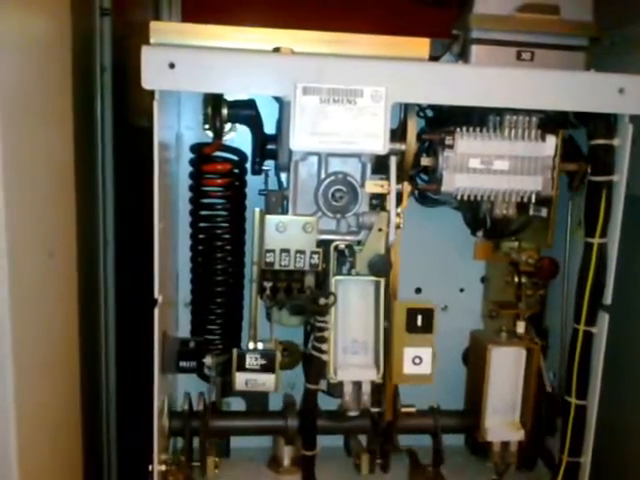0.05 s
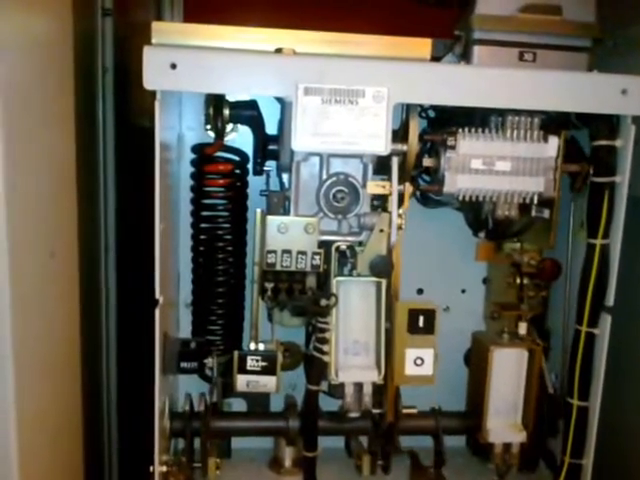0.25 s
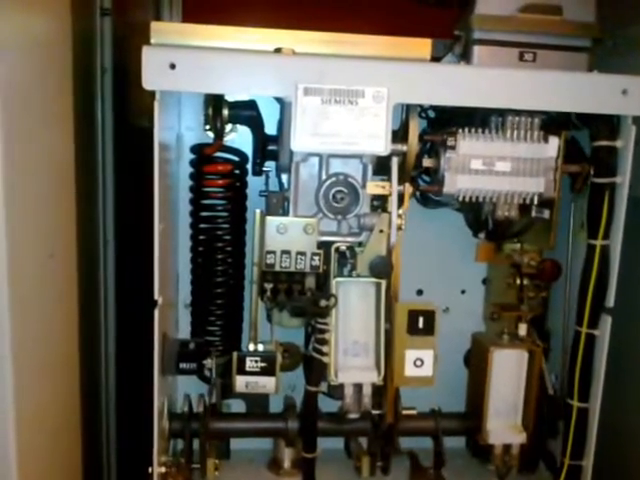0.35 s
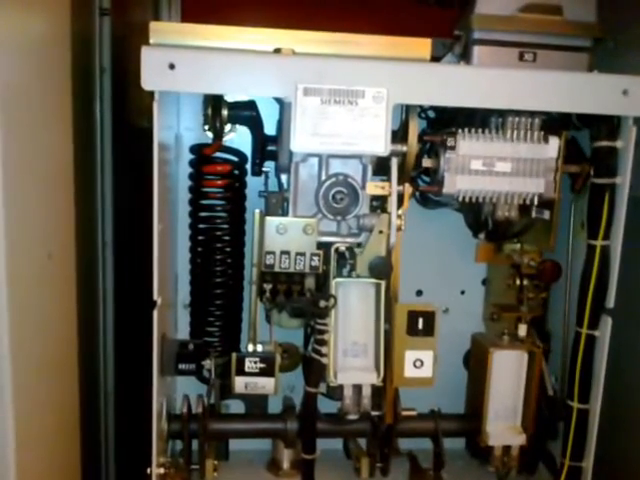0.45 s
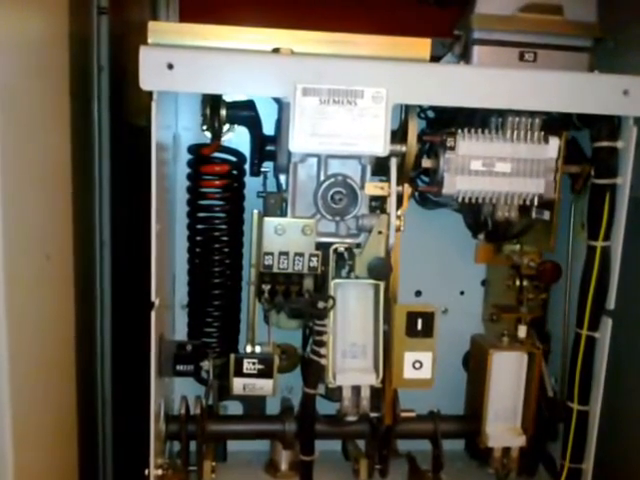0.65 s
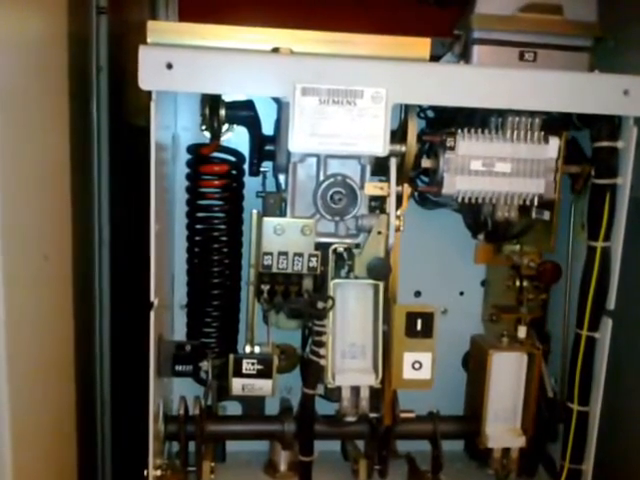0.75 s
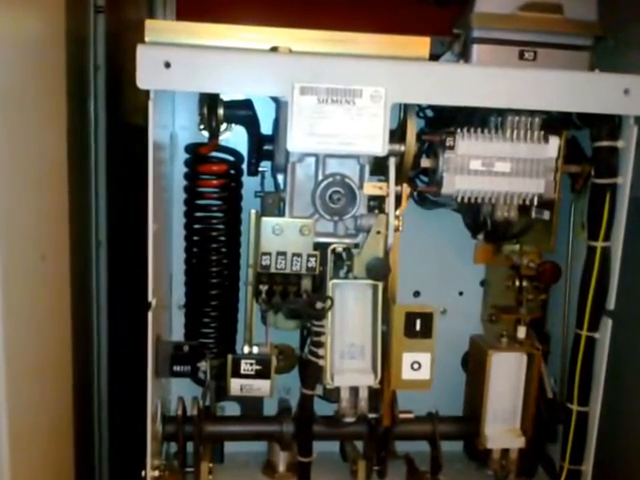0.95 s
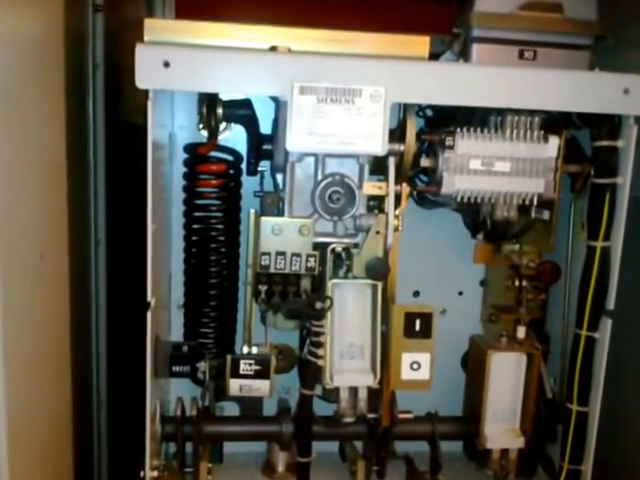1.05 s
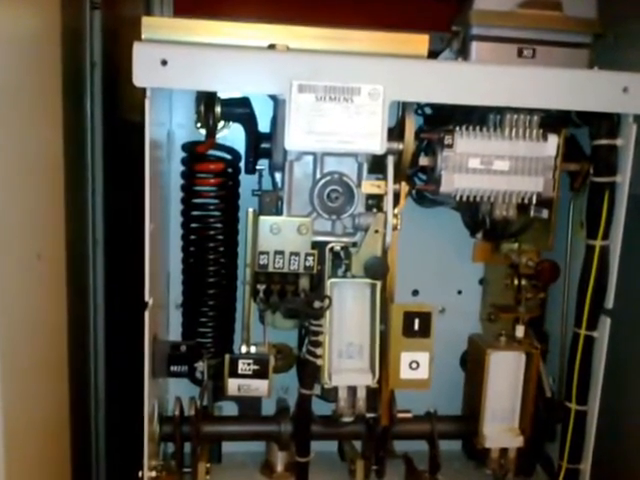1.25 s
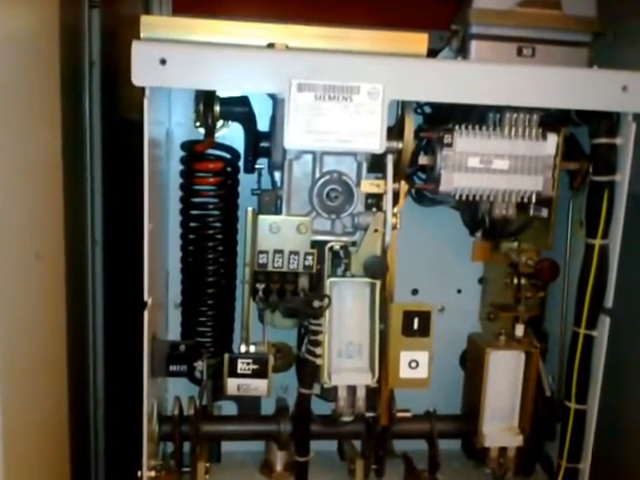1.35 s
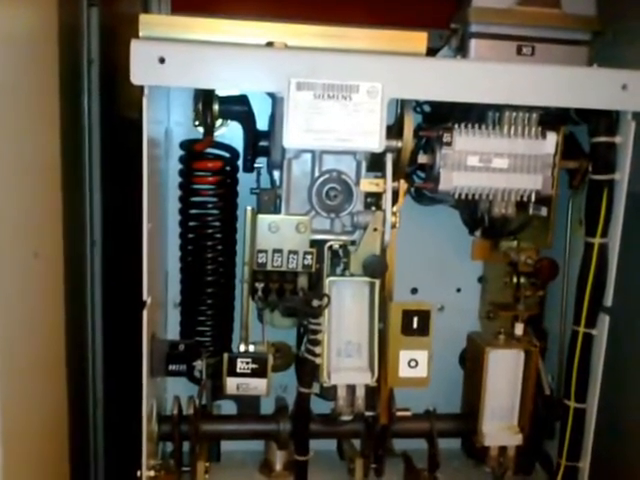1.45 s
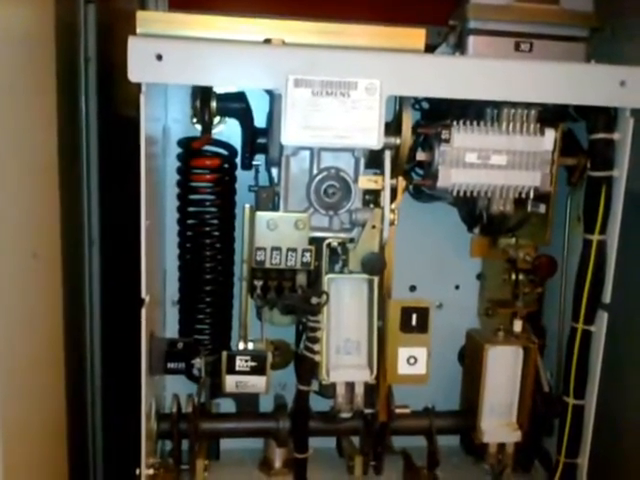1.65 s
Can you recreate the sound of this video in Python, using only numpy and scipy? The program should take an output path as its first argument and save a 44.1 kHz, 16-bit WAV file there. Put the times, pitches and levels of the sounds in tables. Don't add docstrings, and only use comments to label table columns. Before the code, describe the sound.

A heavy circuit breaker slams shut inside a steel cabinet: brief latch rattle, crushing metallic bang with a tiny scrape, low frame thud, then panels ring out in a hard room, close microphone overloading.

```python
import sys
import numpy as np
from scipy import signal
from scipy.fft import rfft, irfft
from scipy.io import wavfile
from scipy.ndimage import uniform_filter1d

SR = 44100
rng = np.random.default_rng(int(sys.argv[2]) if len(sys.argv) > 2 else 0)


def generate_wav(sig):
    pcm = np.round(np.clip(np.atleast_2d(sig).T, -1, 1) * 32767).astype(np.int16)
    wavfile.write(sys.argv[1], SR, pcm)


def invert_db(x):
    u = np.asarray(x, float) / 20
    return 10 ** u


N = 74970
SLAM_S, SHOVE_S = 0.206, 0.2385

# pitch_hz [Hz], t60_s [s]
ROOM_T60 = [(40, 1.8), (140, 2.5), (500, 1.655), (1500, 1.236), (3000, 1.095), (6000, 0.75), (10000, 0.6),
            (15000, .33)]


def set_rms(x, db):
    return x * invert_db(db) / np.sqrt(np.mean(x ** 2))


def read_curve(table, hz):
    table_hz, values = np.array(table).T
    return np.interp(np.log(hz + 1), np.log(table_hz), values)


def coloured_noise(colour):
    hz = np.arange(N // 2 + 1) * SR / N
    spectrum = rfft(rng.standard_normal(N)) * invert_db(read_curve(colour, hz))
    return set_rms(irfft(spectrum, N), 0)


def resonate(x, hz, width_hz):
    return signal.lfilter(*signal.iirpeak(hz, hz / width_hz, fs=SR), x)


def butter(x, order, hz, kind):
    return signal.sosfilt(signal.butter(order, hz, kind, fs=SR, output="sos"), x)


def drone(rows):
    total = 0
    for hz, width_hz, db in rows:
        ringing = resonate(rng.standard_normal(N), hz, width_hz)
        total = total + set_rms(resonate(ringing, hz, 2 * width_hz), db)
    return total


def fade(age, t60_s):
    return (age >= 0) * np.exp(-np.log(1000) * np.maximum(age, 0) / t60_s)


def ramp(age, rise_s):
    return np.clip(age / rise_s, 0, 1)


def earlier_knock(t):
    # pitch_hz [Hz], density_db [dB per Hz]
    colour = [(59, -62.5), (100, -29), (226, 2.5), (360, -31.5), (431, -13), (733, -20.5), (782, -29.5),
              (937, -15), (2200, -45), (2860, -74), (4840, -120)]
    # pitch_hz [Hz], width_hz [Hz], level_db [dB]
    rings = [(480, 120, -52), (2600, 1500, -69), (3800, 900, -66), (6530, 1200, -70), (9700, 400, -82),
             (12500, 4000, -80)]
    wash = butter(coloured_noise(colour), 2, [110, 2500], "band")
    return (set_rms(wash, -40) + drone(rings)) * fade(t, 1.3)


def hum(t):
    # pitch_hz [Hz], width_hz [Hz], level_db [dB]
    panels = [(46, 12, -54), (93.4, 5, -47.5), (138.66, 3, -45.5), (185, 25, -53), (341.2, 12, -64)]
    # pitch_hz [Hz], width_hz [Hz], level_db [dB]
    whine = [(850, 150, -66.5), (3300, 400, -78), (4160, 300, -82), (6200, 250, -87.5)]
    # pitch_hz [Hz], density_db [dB per Hz]
    hiss_colour = [(120, -35), (200, -3), (244, -7), (849, -12.5), (1130, -21.5), (1260, -14), (1910, -28),
                   (6420, -37.5), (15000, -50.5)]
    hiss = butter(coloured_noise(hiss_colour), 2, 200, "high")
    calm_db = -9.5 * (t < SHOVE_S)
    return drone(panels) * invert_db(calm_db) + drone(whine) + set_rms(hiss, -60)


def settling_ticks(t):
    # start_s [s], level_db [dB], pitch_hz [Hz]
    tick_list = [
        (.104, -67, 9500),
        (.676, -70, 13000),
        (.798, -73, 12500),
    ]
    total = 0
    for start_s, db, hz in tick_list:
        tick = drone([(hz, hz / 2, db)])
        total = total + tick * ramp(t - start_s, 0.008) * fade(t - start_s, 0.3)
    return total


def linkage(t):
    # start_s [s], level_db [dB], rise_s [s], t60_s [s], top_hz [Hz]
    blow_list = [
        (0.1904, -19.5, .002, .2, 14000),
        (0.197, -11.5, .004, 0.21, 12000),
        (0.2004, -11.5, .004, .1, 8000),
        (0.2067, 5.5, .002, .05, 11000),
        (.2120, 8, .003, 0.034, 4000),
        (0.2202, 15.5, .003, 0.032, 3000),
        (.2310, -1, .002, .05, 9007),
        (.2390, -2.5, .003, 0.067, 8033),
        (0.26, -12.5, 0.0027, .08, 2000),
    ]
    clicks_per_s, spread_db = 20000, 2
    total = 0
    for start_s, db, rise_s, t60_s, top_hz in blow_list:
        hits = rng.random(N) < clicks_per_s / SR
        unevenness = invert_db(spread_db * rng.exponential(size=N))
        clicks = hits * rng.standard_normal(N) * unevenness
        clicks = butter(clicks, 2, min(top_hz, 0.45 * SR), "low")
        age = t - start_s
        total = total + set_rms(clicks, db) * ramp(age, rise_s) * fade(age, t60_s)
    return butter(total, 1, 250, "high")


def steel_parts(t, blows):
    # pitch_hz [Hz], level_db [dB], t60_s [s]
    modes = [(543.6, -2.5, 0.27), (579.6, -11, 0.98), (1010, -16, 0.8), (1130, -13, .4), (1287.3, -7, 0.43),
             (1286.6, -11, 0.53), (1402, -11, 0.59), (1512, -5, 0.39), (2250, -16.5, .15),
             (2850, -21.5, .25), (3114, -8, 0.33), (4400, -17, 1), (6400, -17, .2)]
    ring = sum(invert_db(db) * np.sin(2 * np.pi * hz * t) * fade(t, t60_s) for hz, db, t60_s in modes)
    return invert_db(-51) * signal.fftconvolve(blows, ring)[:N]


def room(t):
    # pitch_hz [Hz], level_db [dB]
    colour = [(40, -15), (140, -9), (300, -10), (560, -8.5), (1400, -3.5), (1950, -8), (4300, -4),
              (15000, -2.5)]
    room_db, early_db, early_share = -20, -2, 0.22
    age = t - SLAM_S
    echoes = 0
    for hz in 35 * 2 ** np.arange(0, 9, 1 / 3):
        t60_s = read_curve(ROOM_T60, hz)
        decay = fade(age, t60_s) + invert_db(early_db) * fade(age, early_share * t60_s)
        build_up = ramp(age, 0.0088 + 8.5 / hz) ** 2
        grain = resonate(rng.standard_normal(N), hz, hz / 3)
        grain = resonate(grain, hz, hz / 3)
        echoes = echoes + set_rms(grain, room_db + read_curve(colour, hz)) * decay * build_up
    return echoes


def cabinet(t):
    # pitch_hz [Hz], width_hz [Hz], level_db [dB]
    clusters = [(198, 25, -28), (559, 70, -27.5), (1300, 200, -24), (1433, 150, -25), (1565, 170, -28.5),
                (3150, 110, -31.5), (4430, 250, -32), (7050, 300, -42.5)]
    linger = 1.038
    age = t - SLAM_S
    rings = sum(drone([row]) * fade(age, linger * read_curve(ROOM_T60, row[0])) for row in clusters)
    return rings * ramp(age, 0.03)


def cam(t):
    # time_s [s], pitch_hz [Hz], level_db [dB]
    path = [
        (.2095, 1300, -20),
        (.213, 1500, 0),
        (.219, 2900, 3),
        (.224, 2200, 2),
        (.228, 1200, 1),
        (.231, 900, -25),
    ]
    time_s, path_hz, path_db = np.array(path).T
    wobble = set_rms(uniform_filter1d(rng.standard_normal(N), size=30), 0)
    hz = np.interp(t, time_s, path_hz) * (1 + 0.3 * wobble)
    tone = np.sin(2 * np.pi * np.cumsum(hz) / SR)
    scraping = (t > time_s[0]) * (t < time_s[-1])
    return tone * invert_db(np.interp(t, time_s, path_db)) * scraping


def frame(t):
    # start_s [s], peak_db [dB], pitch_hz [Hz], t60_s [s]
    swings = [
        (.2275, 3, 130, .05),
        (.2347, 2, 125, .025),
    ]
    # start_s [s], peak_db [dB], pitch_hz [Hz], t60_s [s]
    thuds = [
        (.2600, -14, 139, 0.79),
        (.3300, -26.5, 53, 2.16),
        (.3300, -32, 52.5, 1.6),
    ]
    total = 0
    for start_s, db, hz, t60_s in [*swings, *thuds]:
        age = t - start_s
        total = total - invert_db(db) * np.sin(2 * np.pi * hz * age) * fade(age, t60_s)
    return total


def air_shove(t):
    age = t - SHOVE_S
    return invert_db(-2) * ramp(age, 0.004) * np.exp(-np.maximum(age, 0) / 0.018)


def scene():
    t = np.arange(N) / SR
    blows = linkage(t)
    breaker = blows + steel_parts(t, blows) + cam(t) + frame(t) + air_shove(t)
    ring_out = cabinet(t) + room(t)
    background = earlier_knock(t) + hum(t) + settling_ticks(t)
    return (breaker + ring_out + background)[None]


def roll_off(x):
    return signal.sosfilt(signal.butter(12, 15660, fs=SR, output="sos"), x)


def record(dry):
    drive_db, knee, top_hz = 0.5, 4, 15700
    x = dry * invert_db(drive_db)
    x = x / (1 + np.abs(x) ** knee) ** (1 / knee)
    x = signal.sosfilt(signal.ellip(8, 0.2, 50, top_hz, fs=SR, output="sos"), x)
    return roll_off(np.clip(x, -1, 1))


dry = scene()
out = record(dry)
generate_wav(out)
```